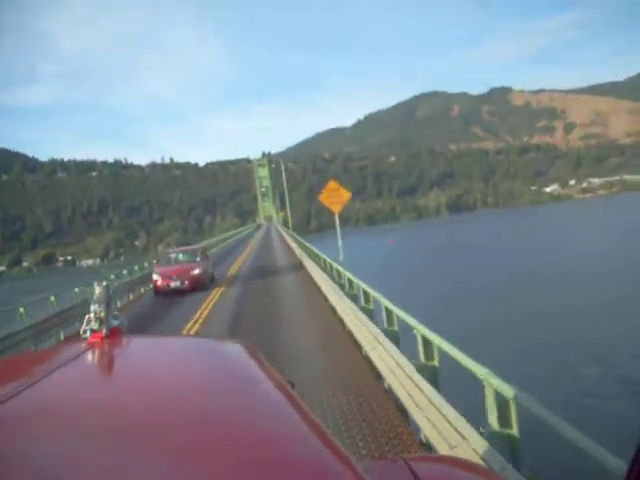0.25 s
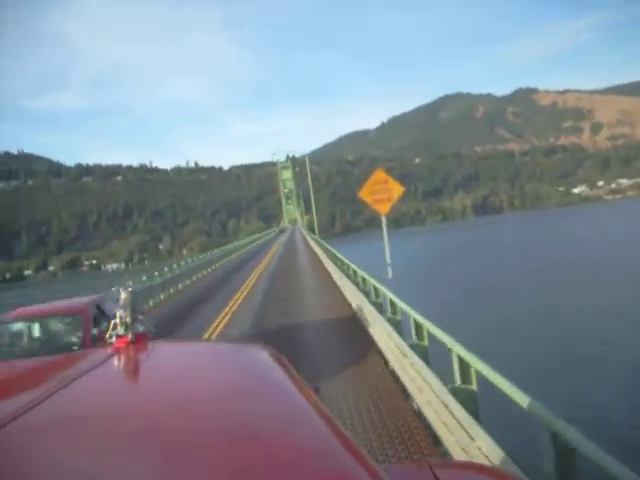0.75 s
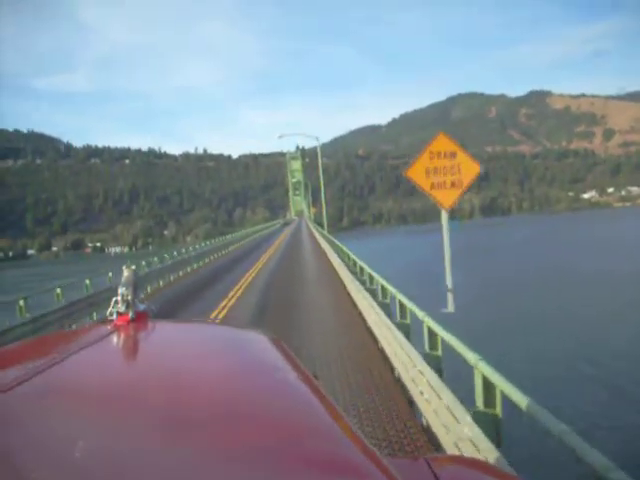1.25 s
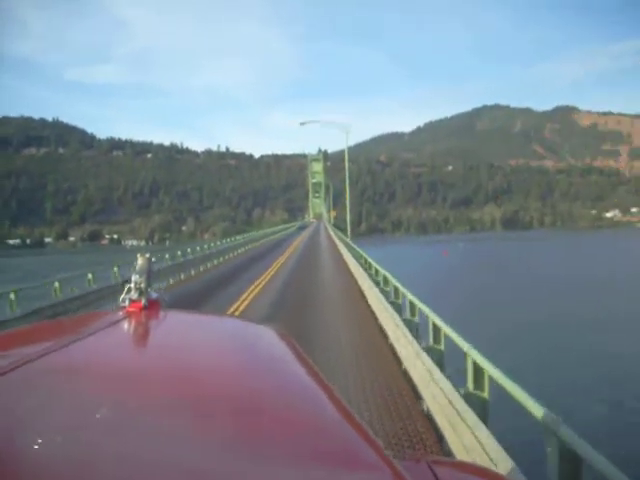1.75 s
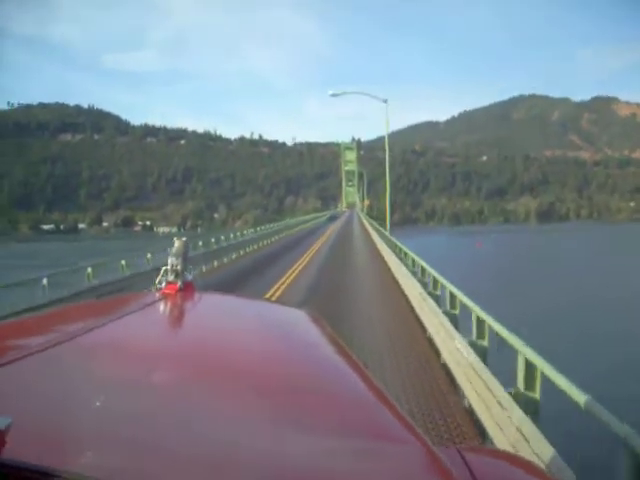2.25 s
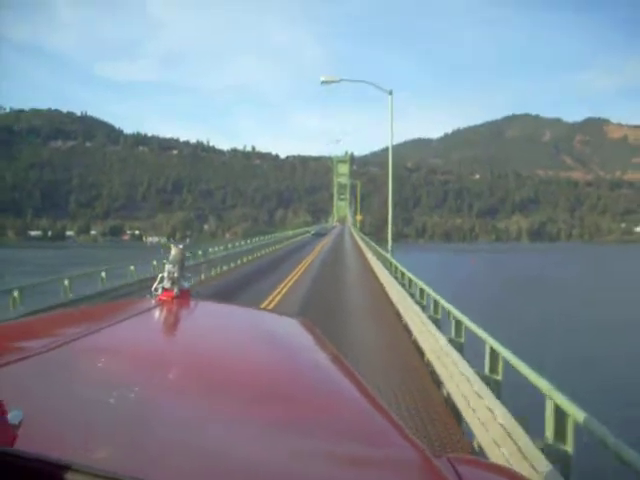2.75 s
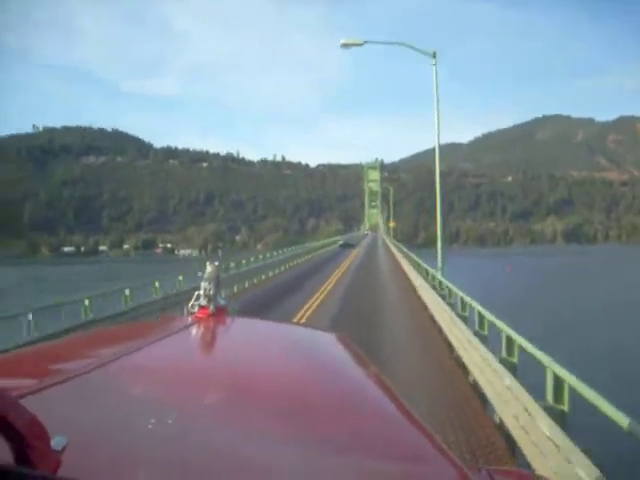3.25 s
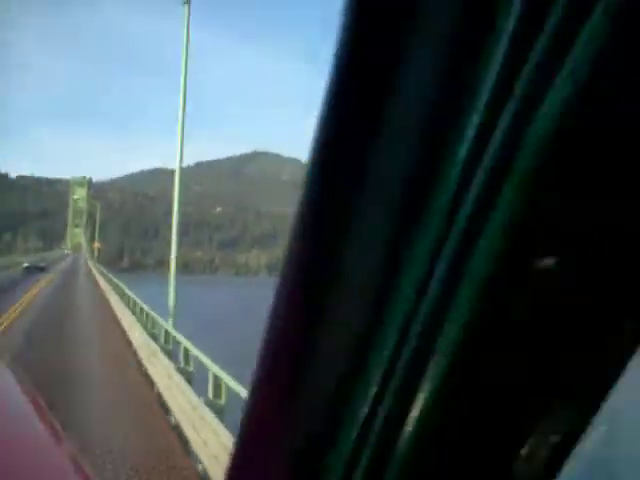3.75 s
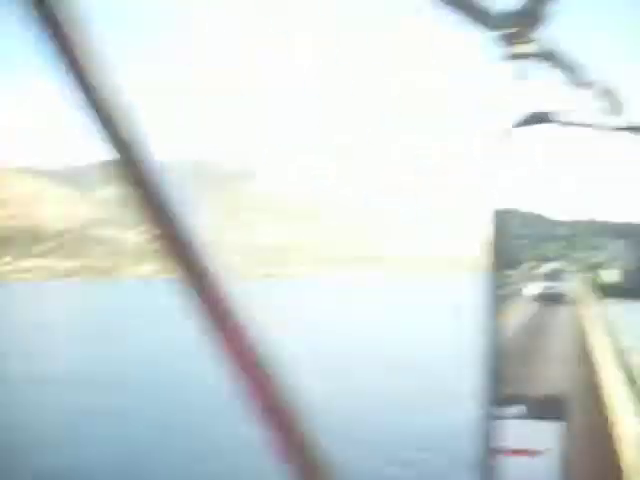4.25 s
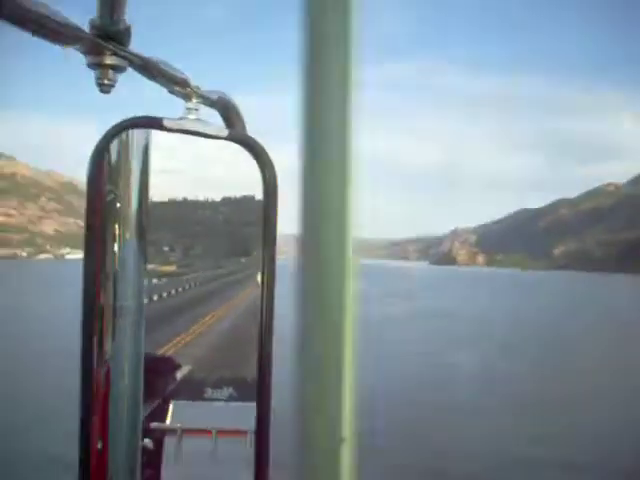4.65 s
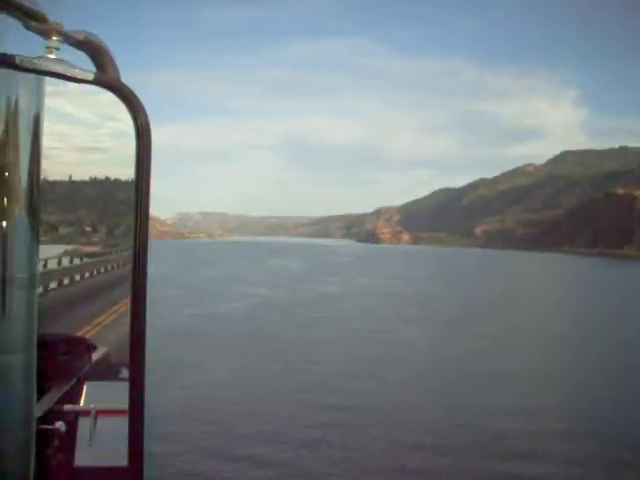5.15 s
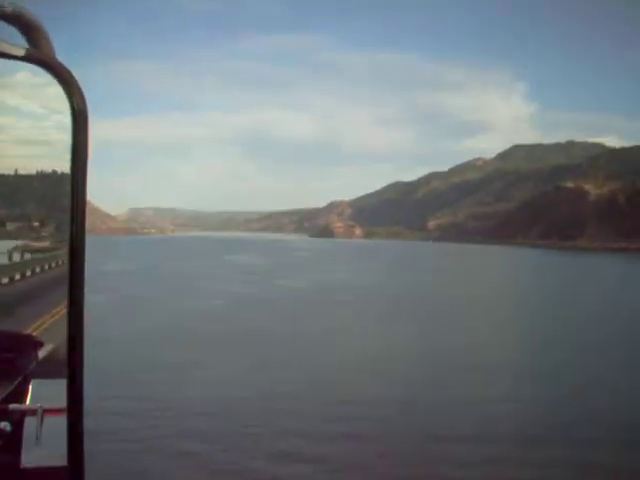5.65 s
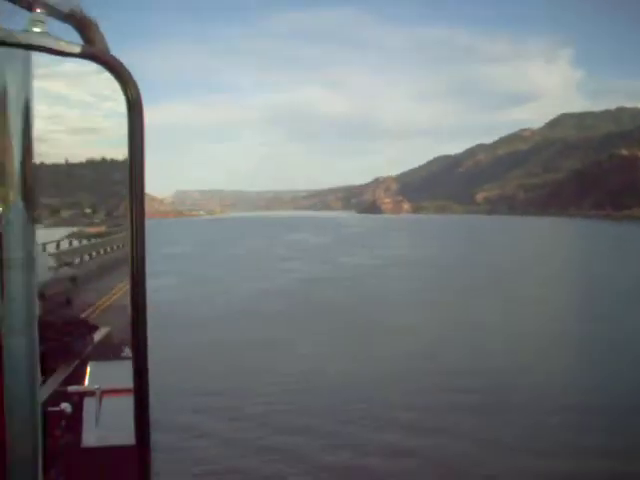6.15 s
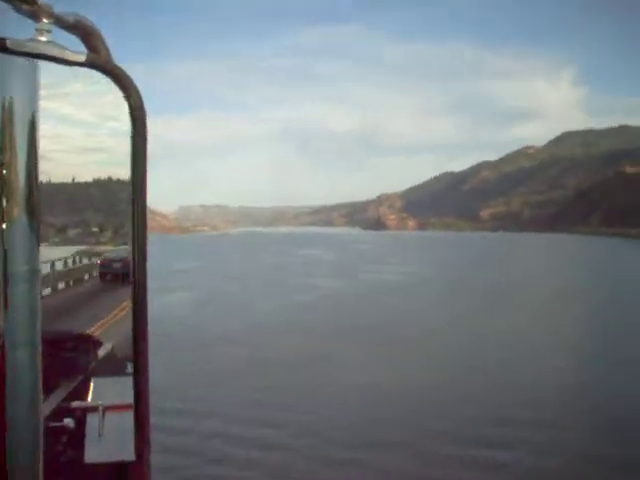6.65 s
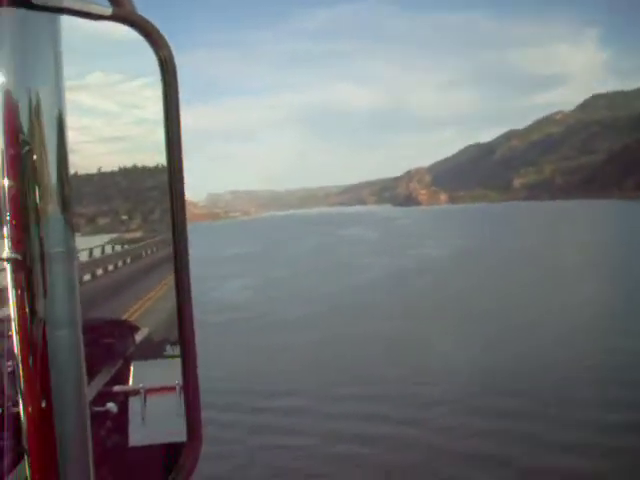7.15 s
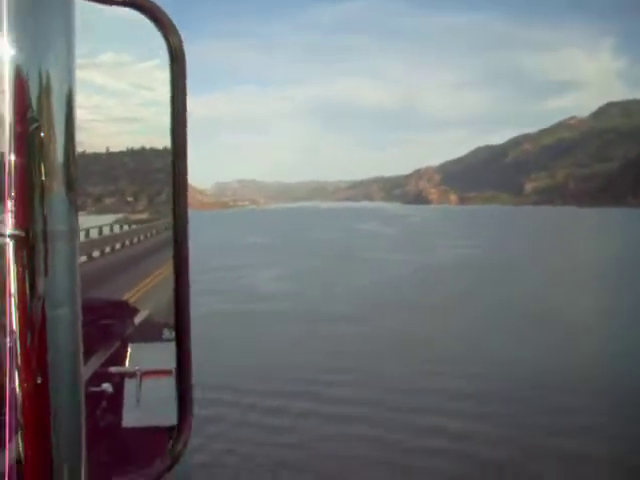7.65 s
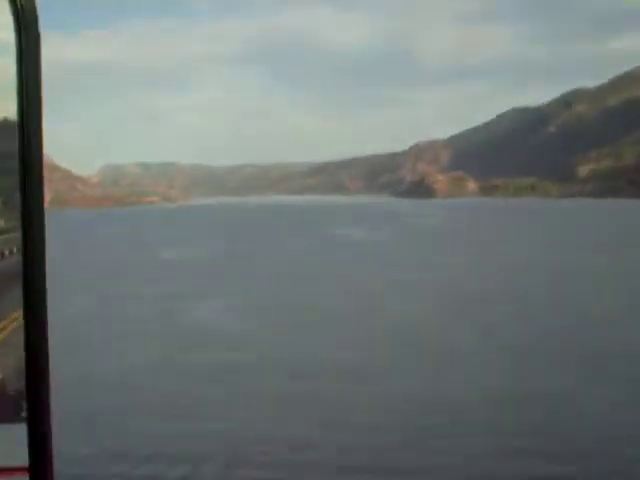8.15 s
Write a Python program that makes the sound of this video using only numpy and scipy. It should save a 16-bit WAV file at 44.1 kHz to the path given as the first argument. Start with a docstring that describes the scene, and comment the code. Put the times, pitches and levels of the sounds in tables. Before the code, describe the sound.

Inside an old diesel truck crossing a bridge, a smeared, boomy engine drone surges beneath tyre roar and a strong ringing wind hiss. Small squeaks come and go. Half way, the microphone swings past the door pillar to the open window, where the exhaust chugs more clearly and pulls harder. A hard knock from a deck joint comes near the end, then the sound stops dead.

```python
"""An old six-cylinder diesel truck chugs across a bridge, its speed slowly rising, heard from the booming cab.
Half way the microphone turns to the open side window, where the exhaust is clearer and works harder.
The engine is a sum of tones at multiples of its cycle rate; gears, a singing panel and brief squeaks are sines.
Road roar and a ringing wind hiss are filtered noise, fluttering with the injectors and valves.
A faint turbo whistle and whine lie on top; a deck joint knocks near the end, and the loudest peaks clip."""
import sys
import numpy as np
from scipy import signal
from scipy.fft import rfft, irfft, next_fast_len
from scipy.io import wavfile
from scipy.ndimage import uniform_filter1d, minimum_filter1d

SR = 44100
rng = np.random.default_rng(int(sys.argv[2]) if len(sys.argv) > 2 else 0)


def dump_mix(stems):
    """Bounce the given channels to the path in sys.argv[1] as a 16-bit WAV at rate SR."""
    frames = np.atleast_2d(stems).T  # one column per channel
    limited = np.clip(frames, -1, 1)  # hard clip at full scale
    pcm = np.round(limited * 32767).astype(np.int16)
    wavfile.write(sys.argv[1], SR, pcm)


N = 370022
T = np.arange(N) / SR  # time in seconds

# the microphone swings from the cab to the side window: middle of the turn and its length, in seconds
TURN_AT_S, TURN_TAKES_S = 4.31, 0.7
# it passes the door pillar at this time in seconds
PILLAR_AT_S = 3.975
# a panel sings on this multiple of the engine's cycle rate
SING_ORDER = 51

# the engine gathers speed ever more slowly: four-stroke cycles per second at the start and in the end,
# time constant in seconds, and crank position at the start in cycles
START_HZ, CRUISE_HZ, GATHER_S, START_TURNS = 15.6376, 17.0655, 10, -.099


def speed():
    """Engine cycles per second, creeping up towards cruising speed."""
    return approach(START_HZ, CRUISE_HZ, GATHER_S)


# the exhaust at the window works harder as the truck pulls on: dB at the turn, and growth in dB per second
LOAD_DB, LOAD_DB_PER_S = -1, 0.52
# the engine takes up the load at the start: first level in dB, and time constant in seconds
PULL_START_DB, PULL_S = -1, 0.38
# the exhaust comes through the window a little ahead of the road noise, in seconds
EXHAUST_LEAD_S = .06


def engine(turns, window):
    """The exhaust, smeared in the cab and a clear chug at the window; the boom, the singing panel and the gears."""
    shaft = turns + 0.00035 * walk(25)  # the crank runs slightly unevenly
    # a quarter turn from cab to window, so the two exhaust sounds crossfade at even power
    facing = rise(TURN_AT_S - EXHAUST_LEAD_S, TURN_TAKES_S) * np.pi / 2
    inside = exhaust(shaft, axis=1, scatter=1.42, waver_db=2.5) * np.cos(facing)
    outside = exhaust(shaft, axis=2, scatter=0.25, waver_db=1.0) * np.sin(facing)

    load = undb(LOAD_DB + LOAD_DB_PER_S * (T - TURN_AT_S))
    pull = undb(PULL_START_DB * np.exp(-T / PULL_S))
    chug = (pull * inside + load * outside) * undb(0.63 * walk(40))
    return chug + boom(shaft) + panel(shaft, window) + gears(turns, window)


# The strongest tones of the engine, before the load, the pull and the turn of the microphone.
# Each row: multiple of the cycle rate, level in the cab in dB rms, level at the window in dB rms.
STRONG_ORDERS = [(3, -40.5, -43.5), (4, -44, -49), (6, -34, -25), (7, -34, -34.5), (8, -40.5, -55.5),
                 (9, -35, -27), (10, -40.5, -39), (11, -29.5, -33), (13, -39.5, -42), (14, -38, -47),
                 (15, -32.5, -32), (16, -38, -27.5), (17, -48, -40.5), (18, -35, -26.5), (19, -45, -33.5),
                 (20, -53.5, -30), (21, -43, -37), (22, -44.5, -35.5), (23, -42.5, -33.5), (24, -34, -36),
                 (25, -35.5, -27.5), (26, -35.5, -32), (27, -41, -38.5), (28, -36.5, -34.5),
                 (29, -32.5, -30.5), (30, -37, -44.0), (32, -41.5, -39.5), (35, -46, -38), (36, -37, -40.5),
                 (37, -35.5, -39), (38, -41.5, -38), (39, -44, -36.5), (40, -48, -40), (41, -41.5, -31.5),
                 (43, -50.5, -42), (45, -44.5, -35.5), (52, -36.5, -42), (54, -38.5, -39.5), (56, -53, -40),
                 (57, -45.5, -41.5), (58, -49, -41.5)]
# The curve that the weaker tones follow, give or take a few dB.
# Each row: pitch in Hz, level in the cab in dB rms, level at the window in dB rms.
WEAK_ORDER_CURVE = [(15.97, -68, -62.5), (32, -51.5, -53), (80, -51, -48.5), (500, -42.5, -42.5),
                    (780, -48, -47), (1000, -49.5, -46), (1420, -49, -46.5), (1670, -44, -50),
                    (1840, -49.5, -52.5), (2643, -46.5, -47.5), (3400, -43.5, -45), (4200, -58.5, -63)]
# How hard each cylinder fires, in firing order; this shapes how the tones line up in time.
# Each entry: strength in dB.
CYLINDER_DB = [0, -2.5, -4, -1.5, -2, -2]
# the bass trails the treble by this many radians per octave, counted from this pitch in Hz
BASS_TRAIL_RAD, KNOCK_HZ = 2.64, 315


def exhaust(turns, axis, scatter, waver_db, size=4096, count=260):
    """Six unequal firings a cycle, coloured and smeared by the paths to one place; axis 1 is cab, 2 is window."""
    k = np.arange(1, count)  # multiples of the cycle rate
    weak, strong = np.array(WEAK_ORDER_CURVE), np.array(STRONG_ORDERS)
    order_hz = k * speed().mean()
    db = np.interp(np.log(order_hz), np.log(weak[:, 0]), weak[:, axis])
    db = db + 2.0 * rng.standard_normal(len(k))
    strong_index = np.clip(np.rint(strong[:, 0]).astype(int) - 1, 0, len(k) - 1)
    db[strong_index] = strong[:, axis]

    # evenly spaced firings of unequal strength give each tone its phase
    slots = np.arange(len(CYLINDER_DB)) / len(CYLINDER_DB)
    firings = np.exp(-2j * np.pi * np.outer(k, slots)) @ undb(CYLINDER_DB)
    # reflections smear the firings, in the bass and most of all in the treble
    smear = scatter + (130 / order_hz) ** 2 + (order_hz / 850) ** 4
    lag = smear * rng.standard_normal(len(k))
    trail = BASS_TRAIL_RAD * np.log2(order_hz / KNOCK_HZ)
    orders = undb(db) * np.exp(1j * (np.angle(firings) + lag - trail))
    # these two sound as the cab's boom and the singing panel instead
    orders[(k == 2 * len(CYLINDER_DB)) | (k == SING_ORDER)] = 0

    # the low orders stand firm; three interleaved families of upper ones waver as the cab sways
    family = np.where(k < 23, 3, k % 3)
    out = 0
    for n, depth_db in enumerate([waver_db, waver_db, waver_db, 0]):
        # one engine cycle as a wave, played round and round by the crank
        cycle = irfft(np.r_[0, orders * (family == n)], size) * size / np.sqrt(2)
        sound = np.interp(turns % 1, np.arange(size) / size, cycle, period=1)
        out = out + sound * unit(undb(depth_db * walk(2.5)))
    return out


# steady level of the boom in dB rms
BOOM_DB = -28.5
# Broad surges added to the steady boom.
# Each row: middle in seconds, length in seconds, level in dB rms.
BOOM_SWELLS = [(1.08, 1.2, -24), (3.07, 1.42, -24)]


def boom(shaft):
    """The cab resonates on twice the firing rate, in slow surges."""
    gain = undb(BOOM_DB) + sum(undb(db) * surge(at, length) for at, length, db in BOOM_SWELLS)
    return gain * tone(2 * len(CYLINDER_DB) * shaft, 0.87 * walk(12))


# the singing panel: average dB before the throb, in the cab and at the window; middle and length of its fade-in, in s
SING_CAB_DB, SING_WINDOW_DB, SING_FROM_S, SING_ONSET_S = -32.5, -32, 0.93, 1.1
# its throb at the window: rate in Hz, time of one peak in seconds, and depth as a share of the level
THROB_HZ, THROB_PEAK_S, THROB_DEPTH = 1.8, 6.32, 0.58
# the hum of the gap by the pillar: multiple of the cycle rate, peak level in dB rms, length in seconds
GAP_ORDER, GAP_DB, GAP_S = 25, -27.5, .7


def panel(shaft, window):
    """A panel sings along with one engine order, throbbing at the window; the gap by the pillar hums on another."""
    throb = 1 + THROB_DEPTH * window * np.cos(2 * np.pi * THROB_HZ * (T - THROB_PEAK_S))
    db = blend(SING_CAB_DB, SING_WINDOW_DB, window) + 1.2 * walk(14)
    singing = rise(SING_FROM_S, SING_ONSET_S) * throb * tone(SING_ORDER * shaft, db)
    gap = swell(PILLAR_AT_S, GAP_S) * tone(GAP_ORDER * shaft, GAP_DB)
    return singing + gap


# Belts and gears driven by the engine.
# Each row: multiple of the cycle rate, average level in the cab in dB rms, average level at the window in dB rms.
BELTS_AND_GEARS = [(4.16, -42, -54), (24.4, -46, -40.5), (34.78, -39, -29), (63.1, -45, -36.5)]
# how far they slip, in their own cycles, and how much their level wavers, in dB
GEAR_SLIP, GEAR_WAVER_DB = .1, 1


def gears(turns, window):
    """Belts and gears hum between the engine's orders, unsteady in pitch and level."""
    out = 0
    for order, cab, outside in BELTS_AND_GEARS:
        cycles = order * turns + GEAR_SLIP * walk(9)
        out = out + tone(cycles, blend(cab, outside, window) + GEAR_WAVER_DB * walk(11))
    return out


# the turbo spools up: pitch at the start and the pitch it heads for in Hz, time constant in seconds
TURBO_START_HZ, TURBO_TOP_HZ, SPOOL_S = 9420, 10070, 3.6
# its steady level in the cab and at the window, in dB rms
TURBO_CAB_DB, TURBO_WINDOW_DB = -63.5, -76
# Brief flares added to the whistle.
# Each row: middle in seconds, length in seconds, level in dB rms.
WHISTLE_FLARES = [(.6, .35, -65.5), (1.901, .2, -63.5)]
# a thin whine: level in dB rms, middle and length of its fade-in in seconds
WHINE_DB, WHINE_FROM_S, WHINE_ONSET_S = -51.5, 5.7, 1.7


def whistles(window):
    """The turbo's breathy whistle climbs as it spools up; a thin, nearly steady whine fades in later."""
    # fast, wide pitch wander makes the whistle breathy
    turbo_hz = approach(TURBO_START_HZ, TURBO_TOP_HZ, SPOOL_S) + 140 * walk(700)
    flares = sum(undb(db) * swell(at, length) for at, length, db in WHISTLE_FLARES)
    gain = undb(blend(TURBO_CAB_DB, TURBO_WINDOW_DB, window)) + flares
    turbo = gain * tone(np.cumsum(turbo_hz) / SR, 0)
    whine_hz = 5184 + 4 * walk(30)
    return turbo + rise(WHINE_FROM_S, WHINE_ONSET_S) * tone(np.cumsum(whine_hz) / SR, WHINE_DB)


# Brief squeaks of the cab, and short surges of the gears' hum near 550 Hz.
# Each row: middle in seconds, pitch there in Hz, length in seconds, peak level in dB rms, slide in Hz per second.
SQUEAKS_AND_GEAR_SURGES = [(0.106, 1700, 0.02, -22, 1203), (0.645, 541, 0.06, -27.5, 1),
                           (2.63, 930, 0.089, -22.5, -150), (2.745, 446, 0.044, -22, 1),
                           (2.84, 460, 0.07, -26, 198.5), (3.905, 550, 0.04, -22, 0.5),
                           (3.949, 873, 0.5, -31.5, 0), (4.035, 557, 0.058, -20.5, -1),
                           (4.18, 560, 0.068, -22.5, 148)]


def squeaks_and_gear_surges():
    """Squeaks and gear surges sound for a moment, each a sine on a sliding, wavering pitch."""
    out = 0
    for at, hz, length, db, slide in SQUEAKS_AND_GEAR_SURGES:
        pitch = hz * (1 + .004 * walk(60)) + slide * (T - at)
        out = out + swell(at, length) * tone(np.cumsum(pitch) / SR, db)
    return out


# a wheel strikes a joint in the deck at this time in seconds
JOINT_AT_S = 7.145
# The tones that the frame rings with.
# Each row: pitch in Hz, starting peak level in dB, time to die away by 60 dB in seconds.
FRAME_RINGS = [(160, -10, .06), (620, -12, .03), (850, -3, .032)]
# The dull, noisy body of the knock at the joint.
# Each row: middle in seconds, length in seconds, peak level in dB rms.
KNOCK_BODY = [(7.145, 0.025, -15.5), (7.172, .04, -20)]


def joint():
    """A wheel strikes a joint in the deck: a hard knock of dying sines from the frame, with a dull body of noise."""
    age = np.maximum(T - JOINT_AT_S, 0)
    ring = 0
    for hz, db, t60 in FRAME_RINGS:
        ring = ring + undb(db) * np.exp(-np.log(1000) * age / t60) * np.sin(2 * np.pi * hz * age)
    body = colour(noise(), [(20, -7.5), (45, -2), (170, 8.5), (450, -1.5), (750, 0.5), (1100, -6.5), (2500, -55.5)])
    return ring + body * sum(undb(db) * swell(at, length) for at, length, db in KNOCK_BODY)


def clatter(turns, depth_db):
    """Gain that flutters with each injector stroke and with the small knocks of the valves."""
    knocks = rng.standard_normal(4 * len(CYLINDER_DB))
    places = np.arange(len(knocks)) / len(knocks)
    valves = np.interp(turns % 1, places, unit(knocks - knocks.mean()), period=1)
    strokes = np.cos(2 * np.pi * len(CYLINDER_DB) * turns)
    return undb(depth_db * (0.7 * valves + 0.46 * strokes))


# The tone colour of the road and tyre roar; only differences within a column count.
# Each row: pitch in Hz, relative level in the cab in dB per Hz, relative level at the window in dB per Hz.
ROAD_COLOUR = [(11.97, -29.5, -32), (25, -11, -12.5), (50, -6, -12.5), (110, -6, -2), (210, 1, 1),
               (310, -5.5, 1), (400, 0.5, -2.5), (446, 1, 0.5), (498, -5, -1), (565, 2, 5.5),
               (710, -5.5, -1), (819, -4, 1), (1000, -5, -3), (1300, -7.5, -3), (1700, -7, -4.5),
               (2020, -7.5, -4.5), (3100, -10.5, -5), (5000, -47, -52.5)]
# roar at the starting speed in the cab and at the window in dB, and growth in dB per Hz of cycle rate gained
ROAR_CAB_DB, ROAR_WINDOW_DB, ROAR_DB_PER_HZ = -22, -21, 3.5


def road(turns, window):
    """Tyres on the deck as filtered noise, hollow in the cab and fuller at the window; the frame's low rumble."""
    tyres, spectra = noise() * clatter(turns, depth_db=2.5), np.array(ROAD_COLOUR)
    in_cab = colour(tyres, spectra[:, :2])
    at_window = colour(tyres, spectra[:, ::2])
    roar_db = blend(ROAR_CAB_DB, ROAR_WINDOW_DB, window) + ROAR_DB_PER_HZ * (speed() - START_HZ)
    roar = blend(in_cab, at_window, window) * undb(roar_db + .5 * walk(7.1))

    rumble = colour(noise(), [(12, -30), (30, -7.0), (62, 4.0), (80, -13.5), (200, -46.5)])
    return roar + rumble * undb(-46.0 + 2.4 * walk(11))


# The tone colour of the wind; only the differences count.
# Each row: pitch in Hz, relative level in dB per Hz.
HISS_COLOUR = [(1500, -27.5), (2400, -19), (2950, -9.5), (3200, -3), (3320, 0.5), (3420, 0.9), (3545, -0.1),
               (3630, -5.5), (3720, -9), (4000, -15.5), (4600, -24), (5500, -32), (7000, -39.5),
               (9000, -49), (10300, -57), (12000, -68)]
# hiss at the starting speed in the cab and at the window in dB, and growth in dB per Hz of cycle rate gained
HISS_CAB_DB, HISS_WINDOW_DB, HISS_DB_PER_HZ = -18, -18.5, 4.5
# the hiss flutters with the engine: once a cycle in the cab, twice a cycle at the window, in dB
FLUTTER_CAB_DB, FLUTTER_WINDOW_DB = 0.14, 0.83
# one longer gust lifts the hiss: middle and length in seconds, lift in dB
GUST_AT_S, GUST_S, GUST_DB = 3.6, 1.4, 1.1
# the door pillar shades the hiss: length in seconds, change in dB
PILLAR_S, PILLAR_DB = 0.23, -2.5


def wind(turns, window):
    """Hiss that rings near 3.4 kHz, shaken by the engine and by small gusts, and shaded by the door pillar."""
    cab_flutter = FLUTTER_CAB_DB * np.cos(2 * np.pi * turns)
    window_flutter = FLUTTER_WINDOW_DB * np.cos(4 * np.pi * (turns - 1 / 3))
    small_gusts_db = 0.37 * walk(14) + 0.6 * walk(200)
    shake = undb(blend(cab_flutter, window_flutter, window) + small_gusts_db)
    air = noise() * clatter(turns, depth_db=1.67) * shake

    db = blend(HISS_CAB_DB, HISS_WINDOW_DB, window) + HISS_DB_PER_HZ * (speed() - START_HZ)
    db = db + GUST_DB * swell(GUST_AT_S, GUST_S) + PILLAR_DB * swell(PILLAR_AT_S, PILLAR_S)
    return colour(air, HISS_COLOUR) * undb(db)


def undb(db):
    """Decibels to gain."""
    return 10 ** (np.asarray(db) / 20)


def unit(x):
    """Scale to rms 1."""
    return x / np.sqrt(np.mean(x ** 2))


def noise():
    """White noise."""
    return rng.standard_normal(N)


def colour(x, points):
    """Filter by a (Hz, dB) spectrum; rms 1."""
    hz, db = np.transpose(points)
    size = next_fast_len(N)
    f = np.arange(size // 2 + 1) * SR / size
    gain = undb(np.interp(np.log(f + 1), np.log(hz), db))
    return unit(irfft(rfft(x, size) * gain, size)[:N])


def walk(rate):
    """Smooth random wander of rms 1, with the given number of new random points per second."""
    steps = rng.standard_normal(size=8192)
    path = np.interp(T * rate, np.arange(len(steps)), steps)
    return unit(uniform_filter1d(path, int(SR / rate)))


def tone(cycles, db):
    """A sine from its running phase in cycles and its rms level."""
    return np.sqrt(2) * undb(db) * np.sin(2 * np.pi * cycles)


def swell(at, length):
    """A smooth bump in time."""
    return np.exp(-2 * ((T - at) / length) ** 2)


def surge(at, length):
    """A flat-topped bump in time: grows, holds, dies away."""
    return np.exp(-(2 * (T - at) / length) ** 4)


def rise(at, length):
    """A smooth step from 0 to 1, half way at the given time."""
    return .5 + .5 * np.tanh(2 * (T - at) / length)


def approach(start, goal, lag):
    """Settle from a start value towards a goal with a time constant in seconds."""
    return goal + (start - goal) * np.exp(-T / lag)


def blend(cab, outside, window):
    """A value between that in the cab and that at the window."""
    return cab + (outside - cab) * window


def scene():
    """Everything in the cab, driven by the crank angle and by how far the microphone faces the window."""
    turns = START_TURNS + np.cumsum(speed()) / SR
    window = rise(TURN_AT_S, TURN_TAKES_S)  # 0 in the cab, 1 at the window
    mix = engine(turns, window) + whistles(window) + squeaks_and_gear_surges() + joint()
    mix = mix + road(turns, window) + wind(turns, window)
    return mix[None]


# the sound stops at this time in seconds; the treble rolls off above this pitch in Hz
END_S, TOP_HZ = 7.682, 11300
# share of a peak's overshoot, in dB, that the limiter takes away; the rest is clipped
LIMITER_SHARE = 0.33


def record(dry):
    """High peaks clip and a limiter ducks for some milliseconds after; the sound stops dead, the top rolls off."""
    ceiling = .7
    room = ceiling / np.maximum(np.abs(dry), ceiling)
    room = minimum_filter1d(room, size=256, origin=127)  # hold each dip for about 6 ms after the peak
    room = uniform_filter1d(room, size=24, origin=11)  # too slow for the very first instant, which clips
    ducked = dry * room ** LIMITER_SHARE
    flat = np.clip(ducked, -ceiling, ceiling)
    flat = flat * np.clip((END_S - T) / 0.0018, 0, 1)
    return signal.sosfiltfilt(signal.butter(7, TOP_HZ, fs=SR, output="sos"), flat)


dry = scene()
out = record(dry)
dump_mix(out)
```